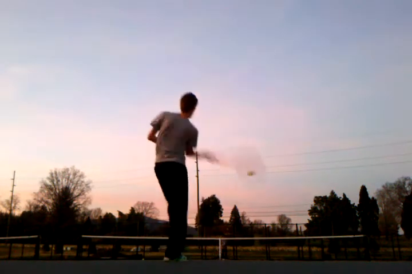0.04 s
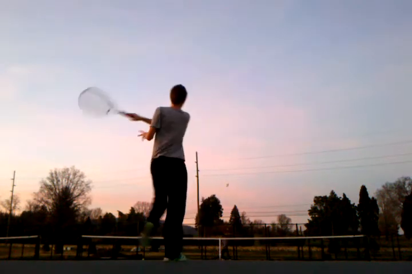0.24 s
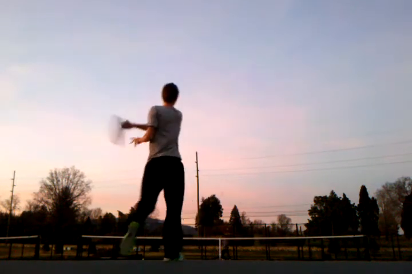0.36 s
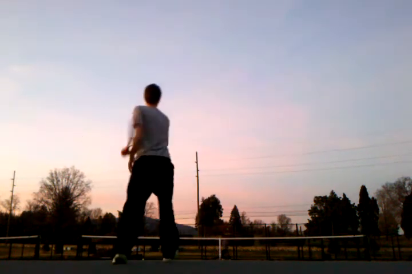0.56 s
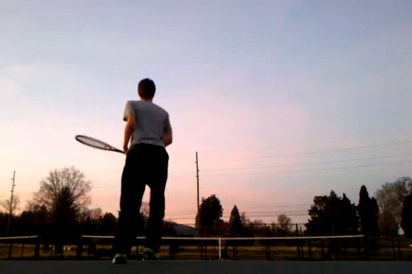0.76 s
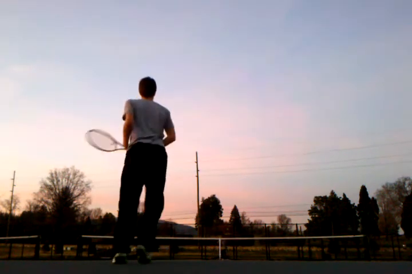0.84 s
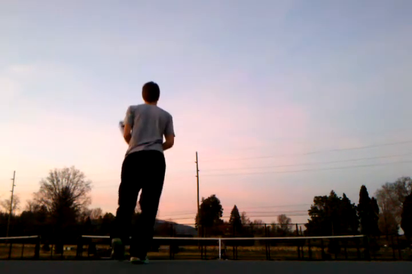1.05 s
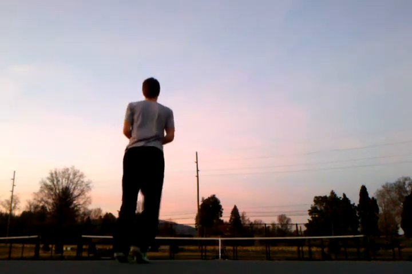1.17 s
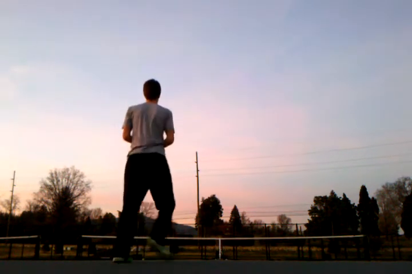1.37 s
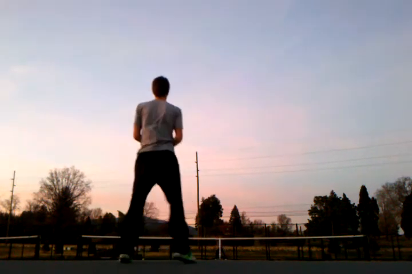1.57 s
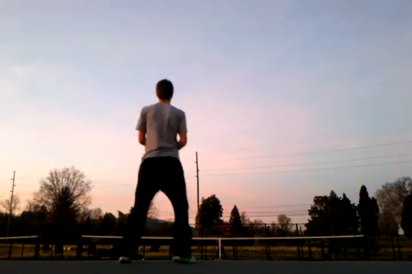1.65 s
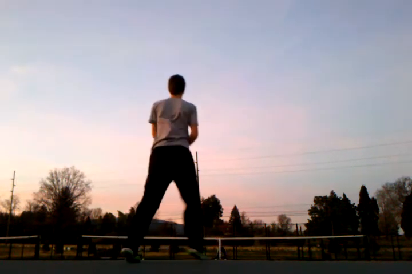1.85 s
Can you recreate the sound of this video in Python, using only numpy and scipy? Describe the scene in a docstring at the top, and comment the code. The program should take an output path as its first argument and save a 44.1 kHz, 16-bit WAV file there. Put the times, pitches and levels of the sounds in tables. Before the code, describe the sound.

A tennis racket hits a ball once, then shoes scuff on an outdoor court.

```python
"""An outdoor hard court, the microphone set low, a few metres from a tennis player.
Distant traffic hums from the start and slowly grows. The racket swishes and the strings pop
as he drives the ball; the ground, trees and fences throw the pop back. Then he recovers:
his shoes thud and scuff on the gritty surface, one sole drags and digs in, and two softer
steps follow."""
import sys
import numpy as np
from scipy import signal
from scipy.io import wavfile
from scipy.ndimage import uniform_filter1d

SR = 44100
rng = np.random.default_rng(int(sys.argv[2]) if len(sys.argv) > 2 else 0)


def transcribe(signal):
    """Save signal, clipped to [-1, 1], as a 16-bit WAV file at the path in sys.argv[1]."""
    frames = np.atleast_2d(signal).T
    limited = np.clip(frames, -1, 1)
    pcm = np.round(limited * 32767).astype(np.int16)
    wavfile.write(sys.argv[1], SR, pcm)


N = 83790
T = np.arange(N) / SR

# Spectra and filters. Each row: frequency in Hz, relative level in dB.
AMBIENT_COLOUR = [(15, -69), (25, -41), (47, -19), (70, -21), (107, 0.5), (162, -6.5), (259, -4),
                  (293, -14.5), (340, -10), (446, -10), (570, -17.5), (747, -9.5), (1030, -15.5),
                  (1280, -19), (1680, -24.5), (2620, -24), (3520, -28), (5220, -30), (6210, -27.5),
                  (7020, -28), (8980, -98), (11700, -100), (19800, -120)]  # hum and hiss all around the court
TRAFFIC_COLOUR = [(200, -23.5), (450, -1), (780, 0.5), (1100, -10), (2000, -19.5), (5000, -43)]  # far traffic
SHUDDER_COLOUR = [(150, -12), (400, -2), (900, -9.5), (1600, -16.5), (4000, -16.5)]  # a sole just after landing
GRITTY_SCUFF_COLOUR = [(300, -12), (1000, -20), (2200, -13.5), (2750, 0.5), (4500, 0), (5200, 2.5),
                       (5600, -3.5), (6400, 1), (8000, -8.5)]  # rubber on grit
DULL_SCUFF_COLOUR = [(300, -11), (900, 2), (1500, 2), (2500, -2.5), (3500, -4.5), (4400, 4.5), (5600, -8),
                     (6700, 4.5), (8000, -4.5)]  # a flat, soft sole
SKIM_COLOUR = [(300, -25), (1200, -32.5), (2300, -16), (3100, -7), (4800, -3), (5700, -2), (6600, -2.5),
               (7300, -0.5), (8800, -1.5)]  # the bright hiss of a skimming sole, and of the swing
DIG_COLOUR = [(300, -25), (1300, -13), (2300, -11.5), (3000, 1), (4200, 0.5), (5700, 3), (6750, 0),
              (8800, -6)]  # a sliding sole with weight on it
BOUNCE_COLOUR = [(150, -14), (500, -10), (980, 4), (1400, -2), (2000, -2), (4000, -6.5), (6900, 4)]  # reflection off the ground
SCATTER_COLOUR = [(100, -4), (270, 0), (450, 0), (620, 1), (800, 4), (940, -1), (1130, 7), (1450, -1),
                  (2000, 4), (2800, 5), (4400, 1), (5500, 1), (7000, -1)]  # diffuse returns
FAR_FENCE_COLOUR = [(100, -5), (270, 2), (500, -12), (900, -5.5), (1140, 14.5), (1450, 2.5), (1800, 0),
                    (3200, -8.5), (4500, 7.5), (5400, 1), (6800, 0)]  # slap from the far fence
FELT_COLOUR = [(200, 1), (700, -7), (1300, -1.5), (2000, -8), (2750, -5.5), (3080, -24.5), (3350, -9),
               (3520, -12), (3900, 1), (4750, -2.5), (5200, -8.5), (5650, -15.5), (6150, -2.5), (6430, -6),
               (6750, -2), (7100, -15.5), (8000, -10.5)]  # felt striking strings
MIC_RESPONSE = [(20, -40), (60, -20), (110, -5), (180, 0), (6900, 0), (7300, -9), (7800, -22), (8600, -28),
                (9300, -42)]  # the microphone loses deep bass and top treble

# Soles landing. Each row: start in seconds, thud level in dB, pitch in Hz, t60 in seconds,
# slap level in dB, shudder level in dB.
LANDINGS = [(0.6143, -25.5, 320, .0105, -29.5, -60), (0.9977, -33.5, 417, 0.014, -39, -48),
            (1.3849, -41, 228, 0.013, -43, -50), (1.7372, -47, 380, 0.025, -40.5, -57)]
# Short scuffs. Each row: start in seconds, level in dB, rise and t60 in seconds, dullness from 0 to 1.
SLIDES = [(0.658, -49.5, 0.015, 0.11, 0.76), (.698, -60, 0.007, 0.33, 0.2), (1.112, -57, 0.011, 0.21, .1),
          (1.19, -64, 0.0099, .1, 0.2), (1.318, -57.5, 0.0088, 0.4, 0.27),
          (1.3827, -31.5, 0.0022, 0.027, 0.02), (1.3935, -45, 0.00059, 0.0065, 0.1),
          (1.399, -66, 0.0065, 0.22, .3), (1.69, -63.5, 0.031, .1, .3), (1.7358, -53, .002, 0.083, 0.8)]
# Single grains snapping. Each row: start in seconds, level in dB, pitch in Hz, t60 in seconds.
GRIT_SNAPS = [(0.6131, -33, 3200, .003), (0.922, -36, 5000, .0012), (1.125, -37, 4200, .0014),
              (1.128, -50, 4500, .0014), (1.3608, -41, 2400, .0018), (1.416, -45, 3800, .0014),
              (1.7498, -35.5, 5940, .0014), (1.789, -49, 4500, .0014)]
# The course of the long drag. Each row: time in seconds, level in dB.
DRAG_ENVELOPE = [(.975, -74), (.992, -47.5), (1.02, -45.5), (1.05, -38), (1.062, -29.5), (1.074, -29.5),
                 (1.086, -30.5), (1.093, -52), (1.102, -60)]
# Resonances of the rubbing sole. Each row: frequency and width in Hz, gain in dB.
TREAD_MODES = [(2770, 250, -4.5), (4250, 90, 3), (5020, 37, 4), (6270, 60, 3), (6800, 60, 9.5),
               (6887, 43, -9)]
# Returns from court, fences and trees. Each row: delay in seconds, gain in dB, rise and t60 in seconds.
SCATTERED_RETURNS = [(.009, -22, .002, 0.17), (0.031, -27, 0.0044, .5), (.2, -32, .02, .13)]
# Modes of ball and racket. Each row: frequency in Hz, level in dB, t60 and rise in seconds.
RACKET_MODES = [(356, -5.2, .0092, .0008), (646, -2.9, .003, .001), (928, -10.7, .02, .0021),
                (1144, -6.7, .0065, .0009), (975, -30, .075, .008), (1280, -37, .05, .002),
                (1550, -21, .012, .0005), (1600, -42, .11, .001), (1960, -47, .13, .001),
                (2106, -31, .034, .0003), (2468, -25, .016, .0003), (3810, -39, .06, .0003),
                (3960, -28, .015, .0003), (4200, -27, .02, .0003), (4500, -33, .022, .0003),
                (6600, -31, .016, .0003), (6800, -34, .03, .0003)]


def amp(db):
    """Decibels to gain."""
    return 10 ** (np.asarray(db) / 20)


def unit(x):
    """Scales to rms 1."""
    return x / np.sqrt(np.mean(x ** 2) + 1e-20)


def colour(x, points):
    """Minimum-phase filter through (Hz, dB) points."""
    hz, db = np.transpose(points)
    bin_hz = abs(np.fft.fftfreq(8192, 1 / SR))
    log_gain = np.log(amp(np.interp(np.log(bin_hz + 1), np.log(hz), db)))
    taps = np.fft.ifft(np.exp(np.conj(signal.hilbert(log_gain)))).real
    return signal.fftconvolve(x, taps[:len(taps) // 2])[:N]


def burst(start, rise, t60):
    """Straight rise, then a decay of 60 dB every t60 seconds."""
    age = T - start
    return np.clip(age / rise, 0, 1) * np.exp(-np.log(1000) * np.maximum(age - rise, 0) / t60)


def ring(start, hz, t60, rise=1 / SR):
    """One struck mode: a dying sine."""
    return burst(start, rise, t60) * np.sin(2 * np.pi * hz * (T - start))


def bump(centre, width):
    """Bell-shaped pulse, timed in seconds."""
    return np.exp(-.5 * ((T - centre) / width) ** 2)


def noise(points):
    """Coloured noise of rms 1."""
    return unit(colour(rng.standard_normal(N), points))


def background(hum_db=-57.5, drift_db=1.5, traffic_db=-75, growth_db_per_s=6.5):
    """Outdoor hum and hiss in drifting patches, with far traffic slowly growing."""
    spectrogram = signal.stft(noise(AMBIENT_COLOUR), nperseg=1024)[2]
    patches = uniform_filter1d(rng.standard_normal(spectrogram.shape), size=10, axis=0)
    patches = unit(uniform_filter1d(patches, size=7, axis=1))
    hum = signal.istft(spectrogram * amp(drift_db * patches))[1][:N]
    traffic = amp(traffic_db + growth_db_per_s * T) * noise(TRAFFIC_COLOUR)
    return amp(hum_db) * unit(hum) + traffic


def steps(rise_s=.0015, slap_lead_s=.0005):
    """Each sole slaps down, thuds and shudders briefly."""
    shudder = noise(SHUDDER_COLOUR)
    out = np.zeros(N)
    for start, thud_db, hz, t60, slap_db, shudder_db in LANDINGS:
        out += amp(slap_db) * bump(start - slap_lead_s, width=.00019)
        out -= amp(thud_db) * ring(start, hz, t60, rise_s)
        out += amp(shudder_db) * shudder * burst(start, rise_s, t60=.04)
    return out


def grains(points, slips_per_s=9000, spread_db=2.5, catches_per_s=700, catch_db=1.6):
    """Dense tiny slips of rubber on grit, in clumps as the sole catches."""
    size = amp(spread_db * np.minimum(rng.exponential(1, N), 4))
    sign = rng.choice([-1, 1], N)
    catch = amp(catch_db * np.interp(T * catches_per_s, np.arange(N), rng.standard_normal(N)))
    slips = rng.random(N) < slips_per_s / SR
    return unit(colour(catch * size * sign * slips, points))


def scuffs():
    """Soles slide briefly, gritty or dull, and grit snaps underfoot."""
    gritty, dull = grains(GRITTY_SCUFF_COLOUR), grains(DULL_SCUFF_COLOUR)
    out = sum(amp(db) * ring(start, hz, t60) for start, db, hz, t60 in GRIT_SNAPS)
    for start, db, rise, t60, dullness in SLIDES:
        rub = np.sqrt(1 - dullness) * gritty + np.sqrt(dullness) * dull
        out += amp(db) * burst(start, rise, t60) * rub
    return out


def drag(weight_on_s=1.0627, weight_span_s=.03):
    """A sole skims the court, tread ringing; weight comes onto the foot and darkens the scrape."""
    level = amp(np.interp(T, *np.transpose(DRAG_ENVELOPE), left=-np.inf, right=-np.inf))
    weight = np.clip((T - weight_on_s) / weight_span_s, 0, 1)
    rub = np.sqrt(1 - weight) * grains(SKIM_COLOUR) + np.sqrt(weight) * grains(DIG_COLOUR)
    tread = sum(amp(db) * signal.lfilter(*signal.iirpeak(hz, hz / width, SR), rub)
                for hz, width, db in TREAD_MODES)
    return level * (rub + tread)


def scatter(delay, db, rise, t60):
    """Impulse response of one cloud of reflections."""
    taps = rng.standard_normal(N) * burst(delay, rise, t60)
    return amp(db) * taps / np.linalg.norm(taps)


def court(direct, ground_delay_s=.0099):
    """The direct sound arrives with its ground bounce, diffuse returns and a slap off the far fence."""
    diffuse = colour(sum(scatter(*row) for row in SCATTERED_RETURNS), SCATTER_COLOUR)
    fence = colour(scatter(delay=.0978, db=-28.5, rise=.015, t60=.06), FAR_FENCE_COLOUR)
    ground = amp(-20) * colour(np.interp(T - ground_delay_s, T, direct), BOUNCE_COLOUR)
    return direct + ground + signal.fftconvolve(direct, diffuse + fence)[:N]


def swish():
    """Racket and sleeve hiss softly through the air."""
    return amp(-49) * bump(centre=.224, width=.023) * noise(SKIM_COLOUR)


def racket(touch_s=.2376, hit_s=.2389, snap_lead_s=.00016):
    """First touch, a snap and crackle of felt on strings, then the ball's thump and the ringing racket."""
    touch = amp(-10) * ring(touch_s, hz=1400, t60=.0018)
    snap = amp(7.5) * colour(np.sinc((T - hit_s + snap_lead_s) * SR), FELT_COLOUR)
    crackle = amp(-25) * noise(FELT_COLOUR) * burst(touch_s, rise=hit_s - touch_s, t60=.038)
    body = -sum(amp(db) * ring(hit_s, hz, t60, rise) for hz, db, t60, rise in RACKET_MODES)
    return touch + snap + crackle + body


def scene():
    """The player from a few metres, on one low microphone, over the background."""
    player = court(racket() + swish()) + steps() + scuffs() + drag()
    return (colour(player, MIC_RESPONSE) + background())[None]


def record(dry):
    """The recorder cuts the treble steeply at 9200 Hz."""
    lowpass = signal.firwin(511, 9200, window=("kaiser", 9), fs=SR)
    return signal.oaconvolve(dry, lowpass[None], "same")


dry = scene()
out = record(dry)
transcribe(out)
```